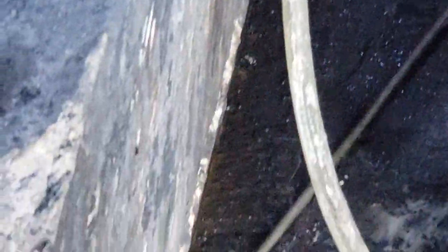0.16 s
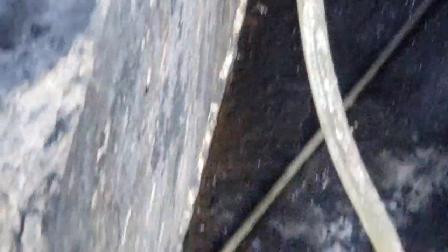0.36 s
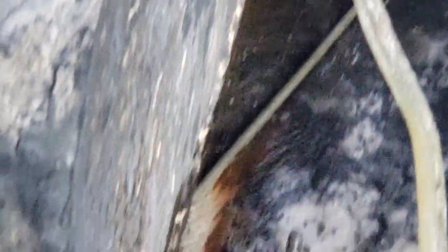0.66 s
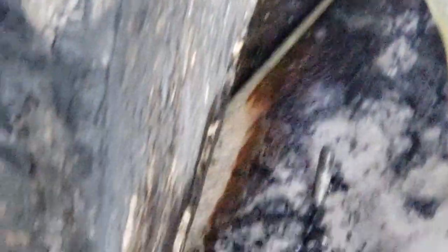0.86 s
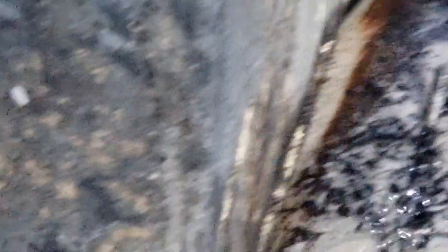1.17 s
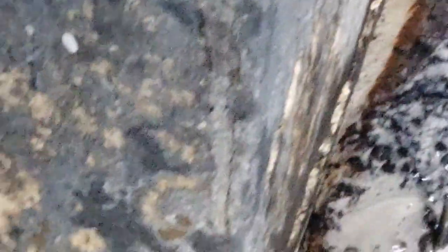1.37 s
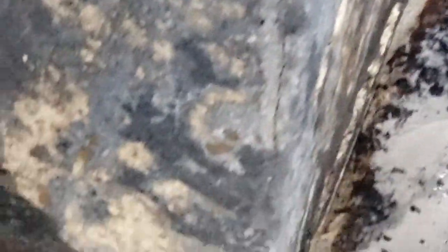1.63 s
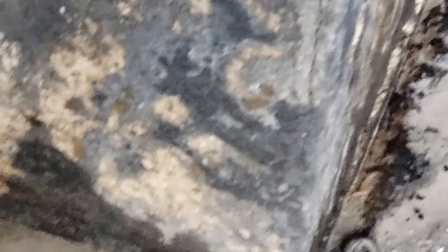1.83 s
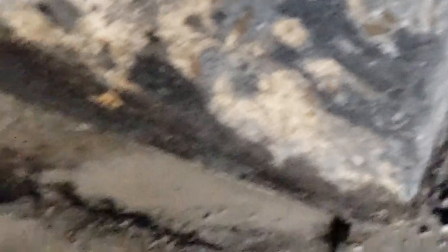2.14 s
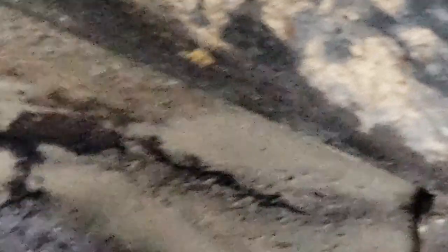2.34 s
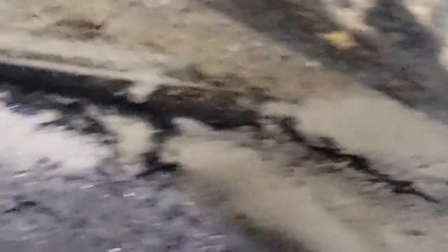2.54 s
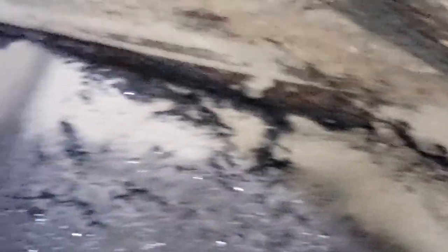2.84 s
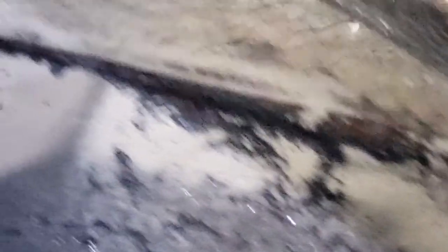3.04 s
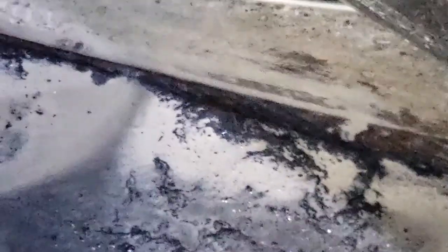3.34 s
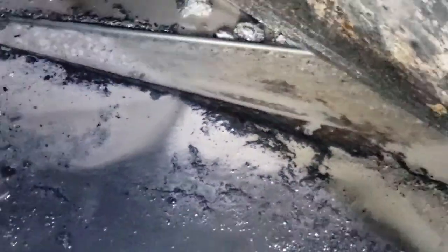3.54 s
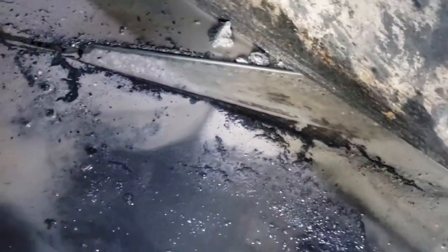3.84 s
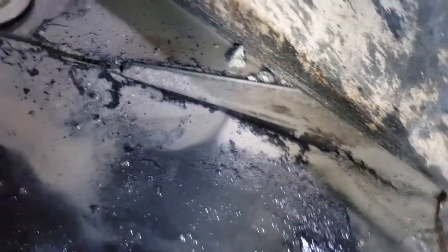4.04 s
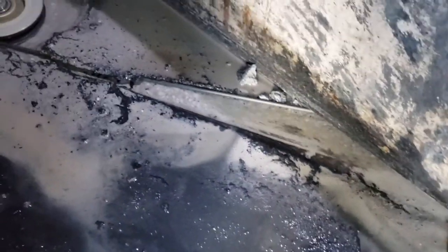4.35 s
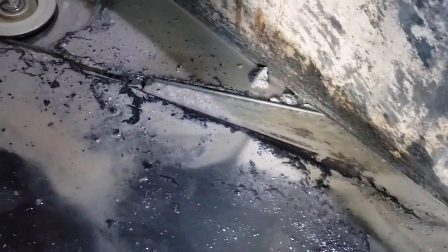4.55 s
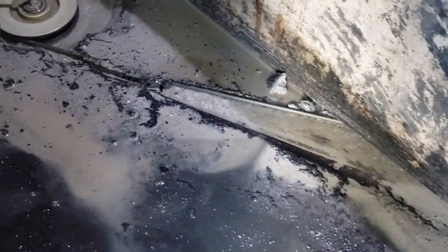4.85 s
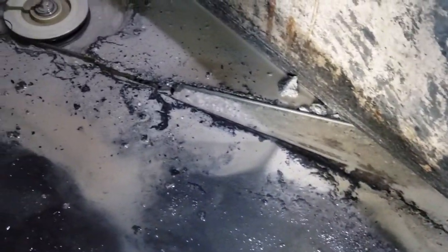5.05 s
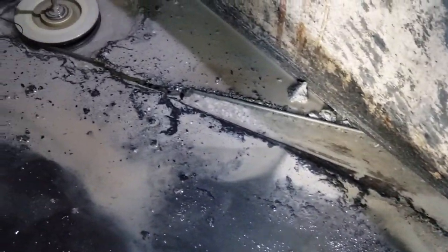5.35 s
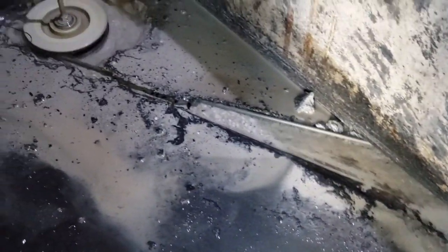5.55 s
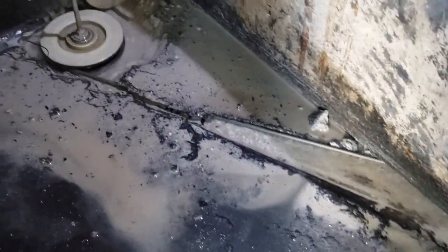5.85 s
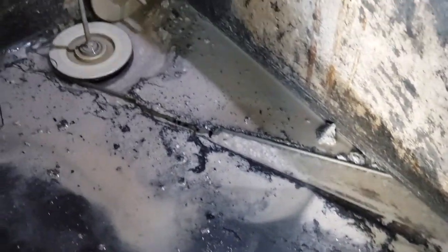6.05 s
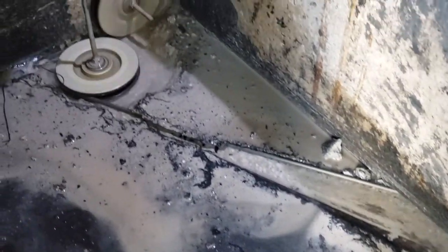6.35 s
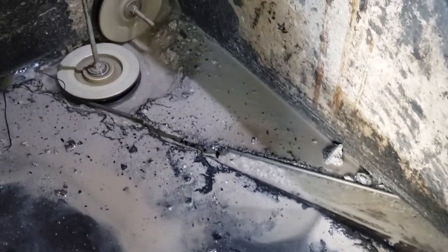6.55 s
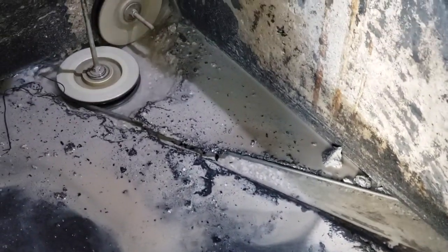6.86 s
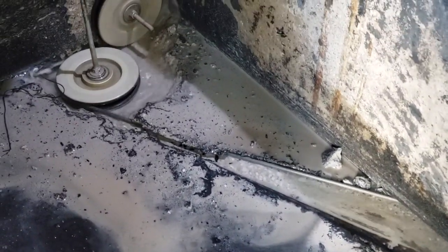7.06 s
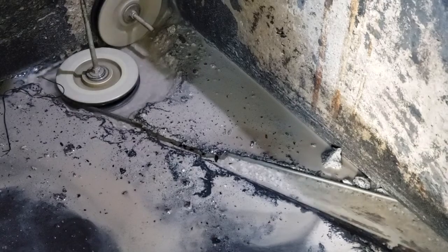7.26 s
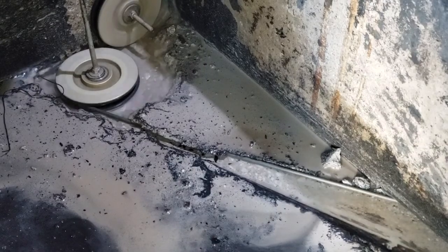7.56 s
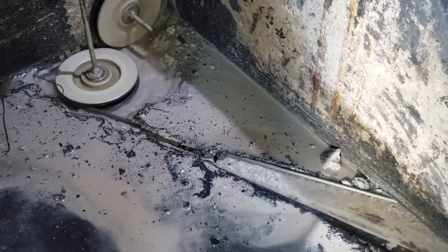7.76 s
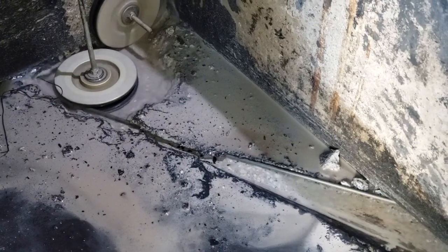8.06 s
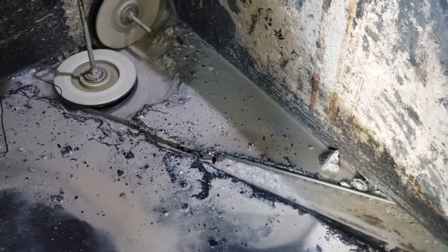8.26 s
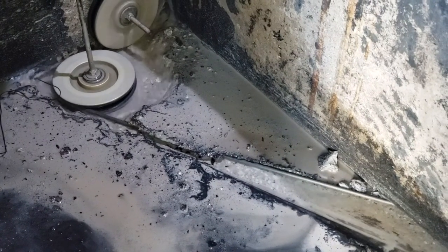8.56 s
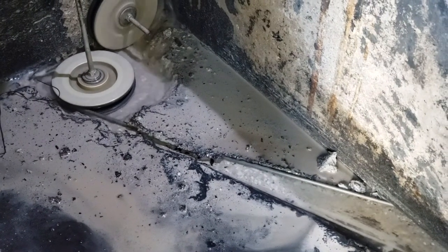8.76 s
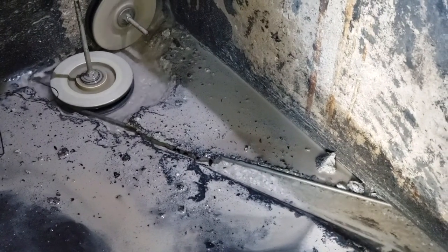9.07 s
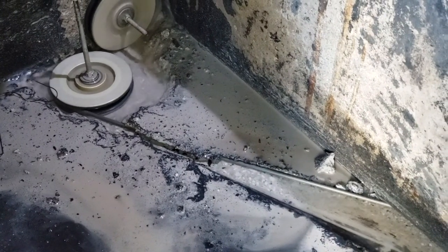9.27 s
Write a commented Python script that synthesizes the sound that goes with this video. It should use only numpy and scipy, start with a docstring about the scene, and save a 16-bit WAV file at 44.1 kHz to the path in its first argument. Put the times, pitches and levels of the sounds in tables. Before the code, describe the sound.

A diamond wire saw cuts wet concrete without pause, close to a hand-held stereo microphone outdoors. Dense crackling grit and a hollow mid-pitched roar mix with fine water hiss. Two pulleys sing a high, slowly beating note; the taut wire rings above it. Short squeaks appear in the first three seconds, then the grinding becomes slightly stronger and more even. Drive and hydraulic pump hum low underneath.

```python
"""Wire saw in wet concrete

A diamond wire saw cuts wet concrete outdoors, near a hand-held camera that turns towards the guide pulleys.
Filtered noise and tiny random impacts make the beads' grit, the slot's roar, the water spray and the mist.
Narrow noise makes the wire ring, two close notes make the pulleys sing with a beat, and short sine tones
make the pulleys and the wire squeal.
Behind them the drive, its hydraulic pump and the frame hum in slightly wavering tones over a noise rumble.
"""
import sys
import numpy as np
from scipy import signal
from scipy.fft import rfft, irfft, next_fast_len
from scipy.io import wavfile
from scipy.ndimage import uniform_filter1d, map_coordinates

SR = 44100
rng = np.random.default_rng(int(sys.argv[2]) if len(sys.argv) > 2 else 0)


def store_wav(level_fs):
    """Save 16-bit WAV to argv[1]."""
    pcm = np.round(np.clip(np.atleast_2d(level_fs), -1, 1) * 32767)
    wavfile.write(sys.argv[1], SR, pcm.T.astype(np.int16))


N = 414540
TIME = np.arange(N) / SR  # seconds

# How hard the wire bites: t/s, grinding level before the trim and quick changes/dB
BITE_LEVEL = [(0.0, -22), (0.44, -22.5), (1.2, -21.5), (1.23, -22), (1.86, -22), (1.96, -22.5), (3.01, -22),
              (3.82, -20.5), (5.97, -21), (7.49, -20), (7.78, -21), (7.91, -21), (8.54, -21.5), (8.77, -21),
              (9.37, -21.5), (9.4, -22)]
# Brief slips (down) and snags (up) of the wire: t/s, half length/s, change of the bite/dB
WIRE_JERKS = [(1.767, 0.044, 0.8), (2.916, 0.028, -2.6), (3.05, 0.024, -1.3), (4.403, .03, -3.5),
              (4.85, 0.028, 0.7), (5.523, .035, -1.5), (6.508, 0.026, -2.5), (7.42, .04, 1),
              (7.7, 0.081, -2), (7.95, .04, 1)]
# Balance as the camera turns, before each layer's trim: t/s, slot roar level/dB, spray level/dB
CAMERA_BALANCE = [(0, -3, -2), (.5, -4, -3), (1.5, -4.4, -2.5), (2.3, -4.5, -2), (3.1, -3, -2.5),
                  (4.1, -4.5, -2.5), (5.5, -4, -2.5), (7.5, -3.7, -3), (9.4, -3.5, -3.3)]
# Hiss of the finest mist as the camera turns: t/s, level relative to the grinding/dB
MIST_LEVEL_CURVE = [(0, -10), (1.4, -14), (2.2, -13), (3.1, -15), (3.35, -11), (4.1, -8.5), (5.5, -11.5),
                    (7.2, -9.5), (9.4, -9)]
# Tone colour of grit breaking out: f/Hz, relative level/dB
GRIT_SPECTRUM = [(1200, -41), (2100, -17), (2550, -7), (2900, -4.5), (3400, -2), (4000, -0.5), (4650, -0.8),
                 (5200, -4), (6500, -4.5), (7500, -4.5), (8500, -13), (12000, -38)]
# Tone colour of the scraping inside the slot: f/Hz, relative level/dB
ROAR_SPECTRUM = [(300, -57), (600, -17), (680, -13.5), (740, -2), (850, 0), (1000, -4.5), (1250, -3),
                 (1410, 1), (1720, -1), (1880, 0.5), (2200, -3.5), (2700, -13), (5000, -44)]
# Tone colour of the flung water: f/Hz, relative level/dB
SPRAY_SPECTRUM = [(4000, -42), (7000, -16), (8400, -2), (9500, 0), (10800, 1.5), (12400, 1), (13000, -1.5),
                  (14300, -6), (15200, -6), (15800, -9.5)]
# Tone colour of the finest mist: f/Hz, relative level/dB
MIST_SPECTRUM = [(9000, -44), (12200, -14), (13200, -6), (14200, 6), (15100, 3), (15800, -3)]
# Resonances of the slot and the pulleys: f/Hz, width/Hz, relative level/dB
SLOT_MODES = [(876, 71, -9), (1109, 27.5, 7), (1398, 40, -2), (1833, 47, -5.5), (2207, 43, -7.5)]
# Ringing of the taut wire, before its fitful changes: t/s, level/dB
RING_LEVEL = [(0, -38), (.9, -32.5), (1.75, -29.5), (2.3, -31.5), (3.7, -43), (5, -40), (7, -36),
              (9.4, -36.5)]
# The pulleys' song as the camera moves, before beat and throb: t/s, level/dB
SONG_LEVEL = [(0, -39), (1.7, -37), (2.3, -29.5), (3.5, -31.5), (4.6, -33), (7, -34.5), (9.4, -34)]
# The drive's hum as the camera moves: t/s, change of level/dB
HUM_LEVEL = [(0, -1.5), (2.8, -1.5), (4.5, 2), (6, 0), (9.4, 0.5)]
# The pump's shrill tone at five times the piston rate, before wavering: t/s, level/dB
WHINE_LEVEL = [(0, -32), (.8, -28.5), (1.4, -26), (2.2, -40), (3.2, -32.5), (4.2, -40), (9.4, -42)]
# Drive tones: multiple of the shaft rate, level before hum change and wavering/dB, phase between ports/rad
DRIVE_TONES = [(10, -49.5, .1), (12, -52.5, .3), (16, -53, -.3), (17, -60, -.2), (20, -48.5, -.5),
               (21, -48, .2), (30, -43, .3), (32, -49, 1)]
# Pump tones: multiple of the piston rate, level before wavering/dB, phase between ports/rad
PUMP_TONES = [(1, -53.5, .5), (2, -43.3, .8), (4, -39.5, 2.3), (6, -45.5, .4), (8, -50, -2.2)]
# Tones of the machine's frame: f/Hz, level before wavering/dB, phase between ports/rad
FRAME_TONES = [(512.8, -55, .3), (811.5, -48, .7), (865.4, -45, -.2), (934, -49, 0), (1041.7, -46, -2.7),
               (1394.3, -45, -2.8), (1453.5, -45, -2.1), (1617.7, -45, -3)]
# Tone colour of the power pack's rumble: f/Hz, relative level/dB
RUMBLE_SPECTRUM = [(20, -24), (35, -9), (50, -7.5), (95, -2), (125, -5.5), (165, -0.5), (235, -0.5),
                   (300, -3.5), (420, -5), (560, -2), (680, -6.5), (900, -37), (2000, -50)]
# Short squeals, of the pulleys near 1.1 kHz and of the wire near 3.65 kHz: t/s, f/Hz, level at the peak/dB
SQUEAL_EVENTS = [(.31, 1130, -23), (1.199, 1108, -22), (1.487, 3670, -26), (1.765, 3650, -24),
                 (2.028, 1105, -21.5), (2.126, 1110, -24), (2.438, 1104, -23), (2.494, 1120, -23),
                 (2.862, 1116, -22.5)]
# Likeness of the two microphone ports: f/Hz, likeness from -1 to 1
PORT_LIKENESS = [(40, 0.97), (150, 0.98), (300, 0.86), (600, 0.6), (870, 0.26), (1100, 0.098),
                 (1800, -0.24), (2150, 0.43), (3200, -0.053), (15000, 0.045)]
# Imbalance of the two ports: f/Hz, left minus right level/dB
PORT_LEAN = [(60, -0.3), (300, 1), (700, 0.7), (1500, 0.5), (5000, 0.8), (9500, 0.5), (14000, -1)]

SHAFT_HZ, PISTON_HZ, BEAD_HZ = 28.21, 368.6, 282.2
SONG_HZ, BEAT_HZ, TURN_HZ = 1105.4, 3.46, 9.6  # first pulley's note, beat and turning rates
GRIND_DB, FLUTTER_DB = 1, 0.39  # trim and quick flutter of the bite
SWAY_DB, SWAY_HZ = .15, 5.5  # depth and rate of the wire's sway
SWAY_DRIFT, TURN_DRIFT = 3.1, 1  # unsteadiness of the sway and of the pulleys' turning, rad
SONG_ROUGH = .35  # quick phase jitter of the song, rad
SQUEAL_S = .015  # half length of a squeal, s
ECHO_DB = 1.7  # depth of the colouring by the walls' echoes
TOP_HZ = 15750  # the camera's band limit


def amp(db):
    """Turn decibels into a gain."""
    return 10 ** (np.asarray(db) / 20)


def unit(x):
    """Scale to an average strength (rms) of 1."""
    return x / np.sqrt(np.mean(x ** 2) + 1e-20)


def along(points, hz):
    """Read a (frequency, value) curve on a log frequency axis."""
    f, value = np.transpose(points)
    return np.interp(np.log(hz + 1), np.log(f + 1), value)


def curves(rows):
    """Draw each column after the time as a curve with one value per sample."""
    s, *columns = np.transpose(rows)
    return [np.interp(TIME, s, column) for column in columns]


def wobble(rate):
    """A smooth random curve with `rate` random points a second."""
    coarse_time = TIME[::32]
    points = rng.standard_normal(int(TIME[-1] * rate) + 4)
    coarse = map_coordinates(points, [coarse_time * rate])
    return np.interp(TIME, coarse_time, coarse)


def swell(s, half):
    """A smooth bell of height 1 around time s, down to 1/e at `half` seconds from it."""
    return np.exp(-np.minimum(((TIME - s) / half) ** 2, 50))


def filtered(x, response):
    """Multiply the spectrum of x by a response, a function of frequency."""
    size = next_fast_len(N + SR // 4, True)  # spare room for the tail
    spectrum = rfft(x, size)
    return irfft(spectrum * response(np.fft.rfftfreq(size, 1 / SR)), size)[..., :N]


def shape(points):
    """The filter response of a (frequency, dB) spectrum."""
    return lambda hz: amp(along(points, hz))


def resonances(modes):
    """The response of (frequency, width, dB) resonances, which ring only after they are struck."""
    def response(f):
        total = 0
        for k, (centre, width, db) in enumerate(modes):
            damping = 1j * f * width
            total = total + (-1) ** k * amp(db) * damping / (centre * centre - f * f + damping)
        return total
    return response


def noise():
    """Two unrelated white noises."""
    return rng.standard_normal((2, N))


def grains(rate, scatter_db):
    """Tiny impacts at random moments, `rate` a second on average, of uneven size; rms 1."""
    hits = rng.random(N) < rate / SR
    sizes = amp(scatter_db * rng.standard_normal(N))
    return unit(hits * sizes * noise())


def patchy(x, depth_db):
    """Vary x in short random patches, and in long narrow ones for the walls' shifting echoes."""
    z = signal.stft(x, nperseg=1024)[2]  # axes: port, frequency, time
    flutter = uniform_filter1d(rng.standard_normal(z.shape[1:]), size=4, axis=0)
    flutter = uniform_filter1d(flutter, size=2, axis=1)
    echoes = uniform_filter1d(rng.standard_normal(z.shape), size=70, axis=2)
    echoes = uniform_filter1d(echoes, size=2, axis=1)
    gain_db = depth_db * unit(flutter) + ECHO_DB * unit(echoes)
    return signal.istft(z * amp(gain_db), nperseg=1024)[1][:, :N]


def ports(pair, response):
    """Colour two noises and spread them over the microphone ports; their middle has rms 1."""
    def spread(hz):
        angle = np.arccos(np.clip(along(PORT_LIKENESS, hz), -1, 1)) / 2
        return response(hz) * np.array([np.cos(angle), np.sin(angle)])
    mid, side = filtered(pair, spread)
    return np.array([mid + side, mid - side]) / np.std(mid)


def tones(rows, base_hz, waver_db, drift):
    """Complex stereo tones at multiples of base_hz, each wavering in level and phase (drift in rad)."""
    out = np.zeros((2, N), complex)
    for multiple, db, lead in rows:
        phase = 2 * np.pi * (multiple * base_hz * TIME + rng.random()) + drift * wobble(3)
        level = np.sqrt(2) * amp(db + waver_db * wobble(5))
        port_phase = np.exp(.5j * lead * np.array([[1], [-1]]))
        out += port_phase * (level * np.exp(1j * phase))
    return out


def bite():
    """Grinding level in dB: the slow feed, the wire's sway and flutter, and its brief slips and snags."""
    sway = SWAY_DB * np.cos(2 * np.pi * SWAY_HZ * TIME + SWAY_DRIFT * wobble(2))
    jerks = sum(db * swell(s, half) for s, half, db in WIRE_JERKS)
    return curves(BITE_LEVEL)[0] + GRIND_DB + sway + FLUTTER_DB * wobble(45) + jerks


def grinding(bite_db):
    """Grit crackles out of the roaring slot; grit, spray and mist pulse as each bead enters."""
    bead_phase = 2 * np.pi * BEAD_HZ * TIME
    beads = 1 + .026 * np.cos(bead_phase) + 0.016 * np.cos(2 * bead_phase)
    roar_db, spray_db = curves(CAMERA_BALANCE)

    crackle = noise() + 0.53 * grains(rate=4000, scatter_db=1)
    grit = amp(-0.5) * ports(patchy(crackle, depth_db=2.2), shape(GRIT_SPECTRUM))

    # the slot gives the scraping its body
    roar = amp(-1.0) * ports(patchy(noise(), depth_db=2.5), shape(ROAR_SPECTRUM))
    hollow = amp(-8.0 + 2.7 * wobble(40)) * ports(noise(), resonances(SLOT_MODES))
    body = amp(roar_db) * (roar + hollow)

    droplets = noise() + .5 * grains(rate=4500, scatter_db=0.0)
    spray = amp(spray_db - 2.0) * ports(patchy(droplets, depth_db=2.5), shape(SPRAY_SPECTRUM))
    mist = ports(patchy(noise(), depth_db=3.0), shape(MIST_SPECTRUM))
    mist = amp(curves(MIST_LEVEL_CURVE)[0]) * mist
    return amp(bite_db) * (beads * (grit + spray + mist) + body)


def wire_ring():
    """The beads scrape the taut wire, whose sharp resonance turns noise into a fitful high ring."""
    resonance = resonances([(3650, 130, 0)])
    ring = ports(noise(), lambda hz: resonance(hz) ** 2)  # squared: a narrower peak
    return amp(curves(RING_LEVEL)[0] + 2.5 * wobble(40)) * ring


def pulleys(loudest_s=0.287, partner=1.0, throb=.6):
    """Two pulleys sing almost the same note, so that it beats; it also throbs with every turn."""
    t = TIME - loudest_s  # the beat is at its loudest here
    beat = 1 + partner * np.exp(2j * np.pi * BEAT_HZ * t)
    turning = 1 + throb * np.cos(2 * np.pi * TURN_HZ * t + TURN_DRIFT * wobble(2.1))
    note = tones([(1, 0, 2.75)], SONG_HZ, waver_db=1, drift=.3)
    jitter = np.exp(1j * SONG_ROUGH * wobble(60))
    return amp(curves(SONG_LEVEL)[0]) * (note * beat * turning * jitter).real


def machine():
    """Turning shaft, pump pistons and frame give wavering tones over the rumble of the power pack."""
    drive = amp(curves(HUM_LEVEL)[0]) * tones(DRIVE_TONES, SHAFT_HZ, waver_db=2.5, drift=0.32)
    pump = tones(PUMP_TONES, PISTON_HZ, waver_db=2.5, drift=1.0)
    whine = amp(curves(WHINE_LEVEL)[0]) * tones([(5, 0, -2.1)], PISTON_HZ, waver_db=2, drift=.7)
    frame = tones(FRAME_TONES, 1, waver_db=1.6, drift=.6)
    rumble = amp(-39.5) * ports(noise(), shape(RUMBLE_SPECTRUM))
    return (drive + pump + whine + frame).real + rumble


def short_squeals():
    """Now and then a pulley or the wire squeals: a short sine tone that swells and fades."""
    squeals = np.zeros(N)
    for s, hz, db in SQUEAL_EVENTS:
        tone = np.sin(2 * np.pi * (hz * TIME + rng.random()))
        squeals += np.sqrt(2) * amp(db) * swell(s, SQUEAL_S) * tone
    return squeals


def scene():
    """All sounds together; the two ports hear them at slightly different levels."""
    mix = grinding(bite()) + wire_ring() + pulleys() + machine() + short_squeals()
    return filtered(mix, lambda hz: amp(np.outer([.5, -.5], along(PORT_LEAN, hz))))


def record(dry):
    """The camera keeps nothing above its band limit."""
    return filtered(dry, lambda hz: hz < TOP_HZ)


dry = scene()
out = record(dry)
store_wav(out)
```